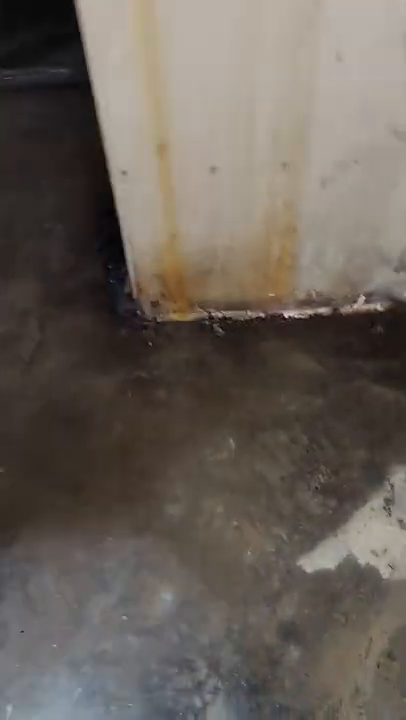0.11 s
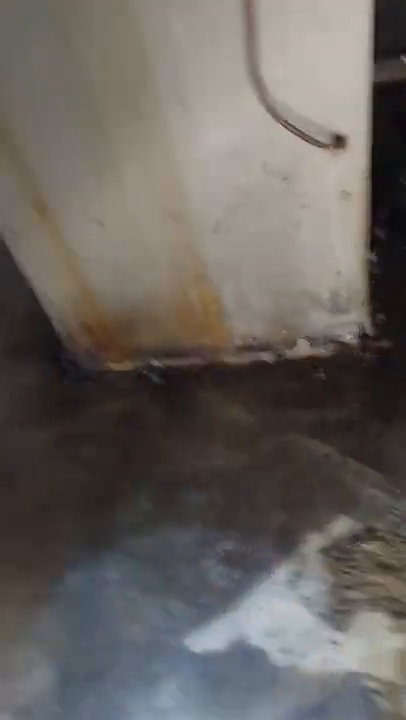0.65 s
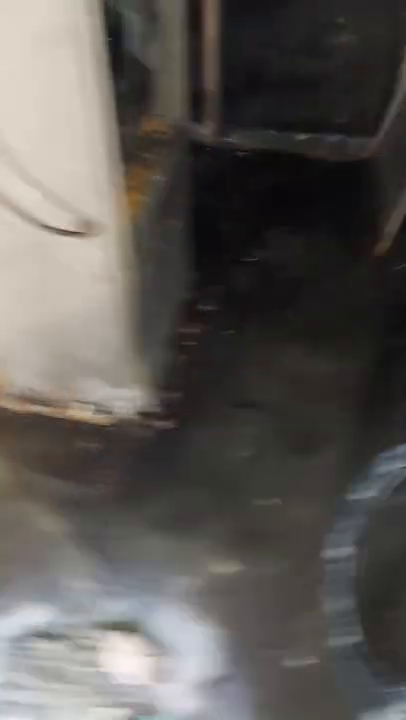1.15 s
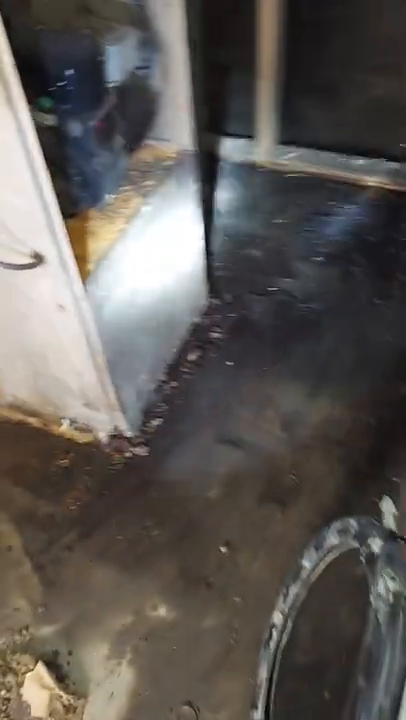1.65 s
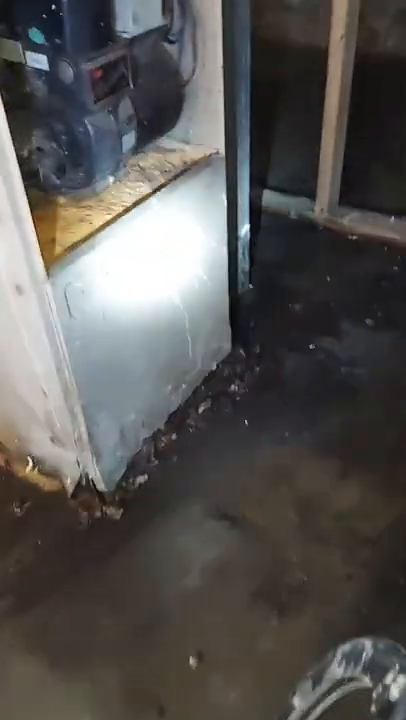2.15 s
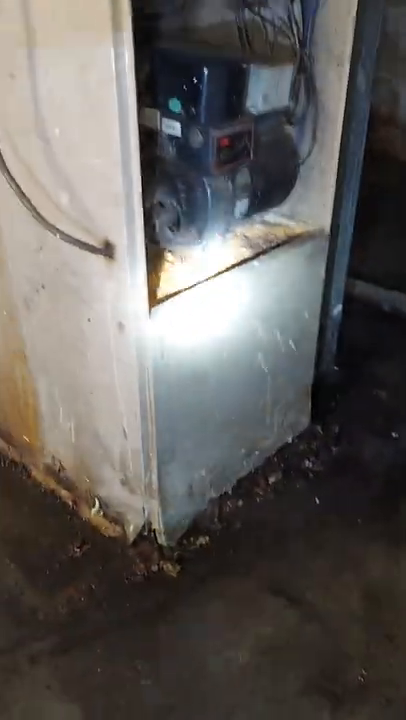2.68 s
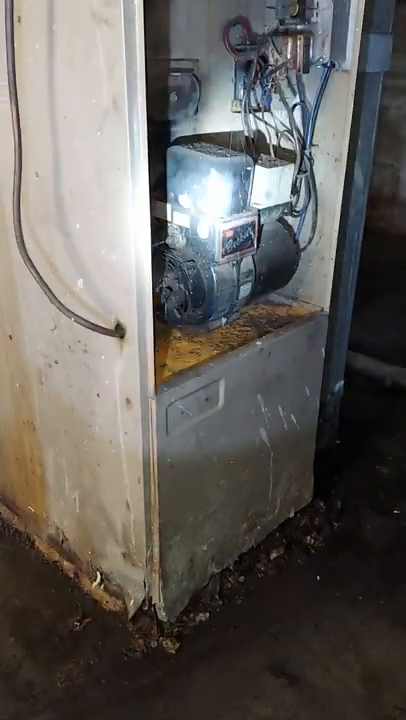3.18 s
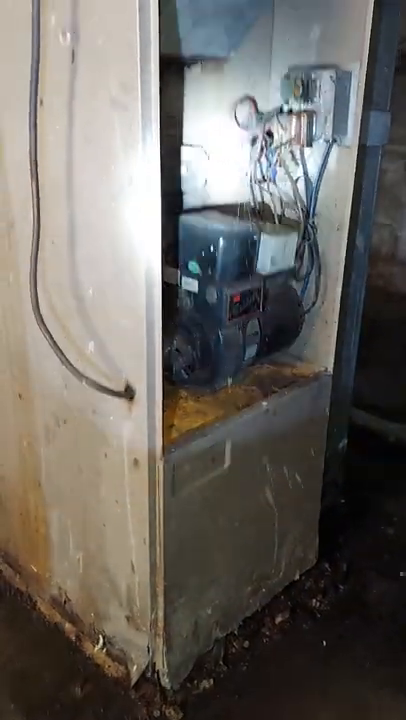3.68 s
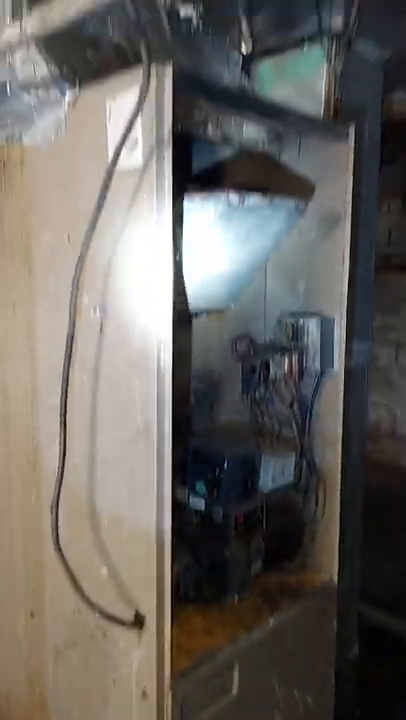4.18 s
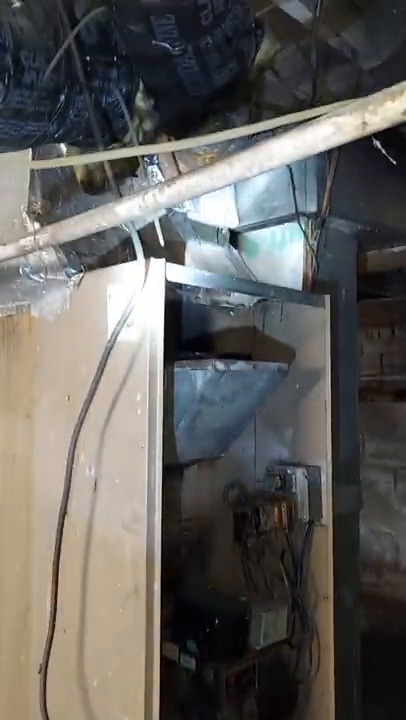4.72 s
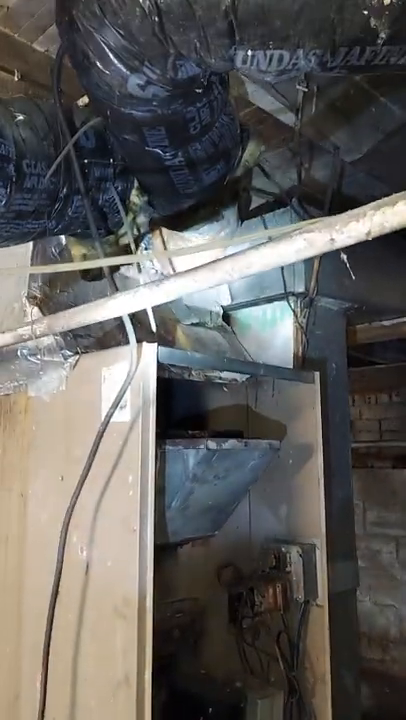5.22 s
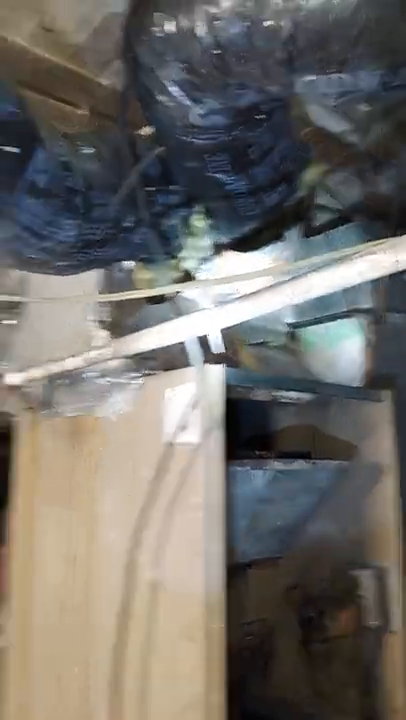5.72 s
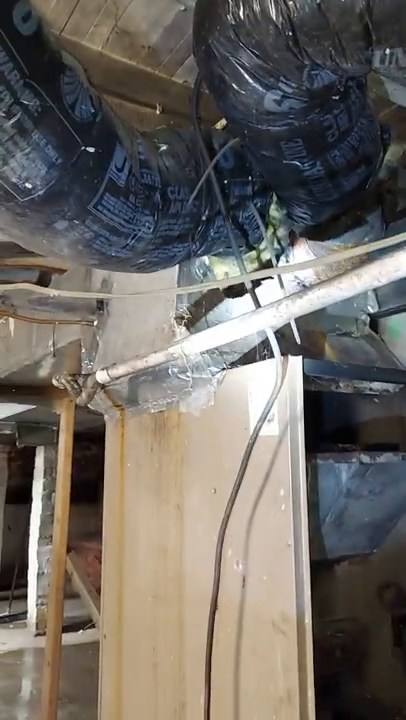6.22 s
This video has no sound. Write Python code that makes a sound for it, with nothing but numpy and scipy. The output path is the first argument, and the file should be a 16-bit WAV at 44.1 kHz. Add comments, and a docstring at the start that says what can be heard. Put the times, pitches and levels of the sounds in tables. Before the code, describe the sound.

In a bare basement, shoes shuffle slowly on gritty concrete close to a handheld phone. Soft crunches and bright cloth rustle come first, then a low finger thump at about one second, mostly on the left. A stronger scrape near two seconds leads to sharp grit clicks around three, then sparse scuffs and a last shuffle over faint hiss.

```python
"""Soles shuffle slowly over a gritty concrete floor in a bare basement; the listener is a phone in the hand.
Grit and cloth swish brightly as noise gated by thousands of tiny slips; weight shifts crunch lower down
with fewer, longer slips. Caught grit squeals as narrow noise, and single grains crack as short clicks
that ring and echo off the walls. Moving air rumbles at the two microphone ports as low noise,
fingers thump as sagging tones, and a faint, nearly steady hiss with some bass lies below."""
import sys
import numpy as np
from scipy import signal
from scipy.io import wavfile

SR = 44100
rng = np.random.default_rng(int(sys.argv[2]) if len(sys.argv) > 2 else 0)


def pcm_store(signal):
    """Save signal as 16-bit PCM."""
    levels = np.round(np.clip(np.atleast_2d(signal), -1, 1) * 32767)
    wavfile.write(sys.argv[1], SR, levels.astype(np.int16).T)


def ratio_of_db(decibels):
    """Turn decibels (scalar or array-like) into linear amplitude factors; 0 dB maps to 1."""
    return 10 ** (np.asarray(decibels, float) / 20)


N = 280476   # length in samples

# how alike the noise is on the left and right: f/Hz, likeness (1 = same, 0 = unrelated)
LIKENESS = [(60, 0.036), (170, 0.98), (400, 0.66), (950, 0)]
# weight comes onto a sole: peak t/s, swell/s, time to fade 20 dB/s, crunch level/dB, centre f/Hz
TREADS = [(0.039, 0.075, 0.33, -48.5, 376), (0.15, 0.025, 0.28, -47.5, 347), (0.235, 0.041, 0.13, -47, 467),
          (0.378, 0.012, 0.25, -49, 310), (0.44, 0.014, 0.53, -54, 425), (0.888, 0.13, 0.5, -54.5, 445),
          (1.13, 0.042, 0.18, -45.5, 297), (1.356, 0.032, 0.64, -54.5, 417), (1.684, 0.04, 0.3, -41, 390),
          (1.711, 0.065, 0.04, -41, 202), (1.784, 0.04, 0.19, -43, 360), (1.91, 0.0175, 0.18, -42, 284),
          (2.012, 0.092, 0.13, -42.5, 535), (2.42, 0.15, 1.73, -60, 480), (2.681, 0.05, 0.17, -52, 350),
          (2.955, 0.031, 0.03, -48.5, 373), (3.268, 0.087, 0.1, -56, 263), (3.635, 0.28, 0.07, -62, 418),
          (4.095, 0.046, 1, -60.5, 423), (4.461, 0.16, 0.23, -56.5, 510), (5.103, 0.161, 0.6, -58, 435),
          (5.47, 0.041, 0.18, -41.5, 400), (5.5, 0.036, 0.2, -51, 220), (5.658, 0.11, 0.9, -58.5, 447),
          (5.879, 0.094, 0.7, -59, 346), (6.04, 0.069, 0.2, -44.5, 460), (6.07, 0.07, 0.11, -40.5, 156),
          (6.188, 0.25, 0.154, -48, 526)]


def rms_one(x):
    """Scale a signal so that its average strength (rms) is 1."""
    return x / np.sqrt(np.mean(x ** 2) + 1e-20)


def at_hz(points, hz):
    """Read a table of (Hz, value) between its points, on a log-frequency axis."""
    table_hz, values = np.array(points).T
    return np.interp(np.log(hz), np.log(table_hz), values)


def band(x, low_hz, high_hz):
    """Keep only the range between two frequencies (Butterworth band-pass)."""
    return signal.sosfilt(signal.butter(2, [low_hz, high_hz], "band", fs=SR, output="sos"), x)


def sides(left_right_db):
    """Gains of the left and right channel for a level difference between them."""
    return ratio_of_db(np.array([[.5], [-.5]]) * left_right_db)


def two_sides(mid, side, hz):
    """Mix two unrelated noises into left and right, as alike as the table asks at this frequency."""
    alike = np.clip(at_hz(LIKENESS, hz), -1, 1)
    return np.sqrt(1 + alike) * mid + np.sqrt(1 - alike) * side * [[1], [-1]]


def drift(rate_hz):
    """Slow random wandering with spread 1: noise smoothed twice, worked out at every 40th sample."""
    r = np.exp(-80 * np.pi * rate_hz / SR)
    noise = rng.standard_normal(N // 40 + 2002)
    slow = signal.lfilter([1], [1, -2 * r, r * r], noise)[2000:]   # skip the filter's start
    return np.interp(np.arange(N) / 40, np.arange(len(slow)), rms_one(slow))


def grains(per_s, spread_db, length_s):
    """Envelope of many slips of uneven size, at random times, each dying away; rms 1."""
    sizes = ratio_of_db(spread_db * np.minimum(rng.exponential(1, N), 5))
    born = rng.random(N) < per_s / SR
    r = np.exp(-1 / (length_s * SR))
    return rms_one(signal.lfilter([1], [1, -r], sizes * born + 1e-18))


def strokes(rows):
    """Each stroke swells in an arch, then fades evenly in dB; powers add. One gain curve per level column."""
    t = np.arange(0, N + 64, 64) / SR   # every 64th sample
    power = 1e-12
    for peak_s, swell_s, fade_s, *levels_db in rows:
        after = t - peak_s
        arch = np.clip(1 - (after / swell_s) ** 2, 0, 1)
        fade = ratio_of_db(-20 * np.maximum(after, 0) / fade_s)
        shape = np.where(after < 0, arch, fade)
        power = power + (ratio_of_db(np.array(levels_db))[:, None] * shape) ** 2
    return [np.interp(np.arange(N) / SR, t, np.sqrt(p)) for p in power]


def rubbing(spectrum, texture, patchy_db):
    """Third-octave bands of stereo noise gated by a texture; each band wanders, so the colour shifts."""
    # left-right balance: f/Hz, left minus right level/dB
    balance = [(500, 4), (1500, -3.5), (5000, 0), (9000, 5), (13000, -1)]
    edges = 40 * 2 ** np.arange(0, 8.8, 1 / 3)
    edges = edges[(edges > .9 * spectrum[0][0]) & (edges < 1.15 * spectrum[-1][0])]
    white = texture * rng.standard_normal((2, 2, N))
    out, power = 0, 0
    for k, (low, high) in enumerate(zip(edges, edges[1:])):
        mid, side = band(white[k % 2], low, high)   # neighbouring bands use different noise
        hz = np.sqrt(low * high)
        level = ratio_of_db(at_hz(spectrum, hz))
        gain = level * ratio_of_db(patchy_db * drift(5.2)) * sides(at_hz(balance, hz))
        out = out + gain * two_sides(mid, side, hz)
        power += level ** 2 * (high - low) * 4 / SR
    return out / np.sqrt(power)   # expected strength without texture, wandering and balance: 1


def pitched(rows, fall_db, edges, texture):
    """Each stroke has its own centre frequency; band by band its noise falls away to both sides."""
    hz = np.sqrt(edges[1:] * edges[:-1])
    shaped = []
    for *timing, db, centre_hz in rows:
        octaves = np.log2(hz / centre_hz)
        slope_db = np.where(octaves < 0, fall_db[0], -fall_db[1])   # per octave: below, above
        share = hz * ratio_of_db(slope_db * octaves) ** 2   # wider bands hold more power
        shaped.append((*timing, *(db + 10 * np.log10(share / share.sum()))))
    white, out = rng.standard_normal((2, 2, N)), 0
    for k, gain in enumerate(strokes(shaped)):
        mid, side = rms_one(band(texture * white[k % 2], edges[k], edges[k + 1]))
        out = out + gain * two_sides(mid, side, hz[k])
    return out


def stillness():
    """Nearly steady faint hiss with some bass: noise bands without slips, each wandering slightly."""
    # colour of the hiss: f/Hz, level per Hz/dB
    hiss = [(24, -52), (40, -9.5), (126, -10), (198, -28), (488, -12), (1010, -39), (1500, -19.5),
            (15800, -31.5)]
    return ratio_of_db(-69) * rubbing(hiss, texture=0.96, patchy_db=1.0)


def air_rumble():
    """Air shoves the ports in gusts and with every tread: lumpy low noise, partly shared by both ports."""
    # gusts: peak t/s, swell/s, level/dB
    gusts = [(0.05, 0.098, -51.5), (1.7, 0.05, -58), (1.93, 0.038, -52), (2.68, 0.073, -57),
             (6.12, 0.075, -46)]
    still_air_db, tread_rumble_db = -78, -16   # floor between shoves; rumble relative to the crunch
    gust_fade = 2.3   # time to fade 20 dB, in swells
    shoves = [(s, swell_s, gust_fade * swell_s, db) for s, swell_s, db in gusts]
    shoves += [(*timing, db + tread_rumble_db) for *timing, db, _ in TREADS]
    rumble, = strokes(shoves)
    wander_db = 2.5 * np.array([drift(9), drift(9)])
    lumps = np.hypot(rumble, ratio_of_db(still_air_db)) * ratio_of_db(wander_db)
    own, shared = rng.standard_normal((2, N)), rng.standard_normal(N)
    return lumps * rms_one(band(own + 1.4 * shared, 42.0, 165))


def thumps():
    """Fingers thump the case: low tones that swell quickly and sag in pitch as they die."""
    # thumps: start t/s, level on the louder side before swell and fade/dB, starting f/Hz, ring/s,
    # left minus right level/dB
    thump_rows = [(0.486, -36.5, 77.5, 0.072, -24), (0.64, -41, 492, 0.026, 2.5),
                  (1.03, -27, 129, 0.018, 11), (1.053, -18, 93.5, 0.045, 37)]
    out = np.zeros((2, N))
    t = np.arange(round(.13 * SR)) / SR
    for s, peak_db, hz, ring_s, pan_db in thump_rows:
        cycles = hz * ring_s * (1 - np.exp(-t / ring_s))   # the pitch sinks evenly in octaves
        swell = (1 - np.exp(-t / .004)) * np.exp(-(2.6 * t / ring_s) ** 2)
        gain = ratio_of_db(peak_db - abs(pan_db) / 2) * sides(pan_db)
        i = round(s * SR)
        out[:, i:i + len(t)] -= gain * swell * np.sin(2 * np.pi * cycles)
    return out


def basement(x):
    """Dense reflections off bare walls: dying noise of its own for each side."""
    t60_s = 0.19   # time for the echoes to die by 60 dB
    t = np.arange(round(.4 * SR)) / SR
    tail = rng.standard_normal((2, len(t))) * ratio_of_db(-60 * t / t60_s) * (t > .003)
    tail = tail / np.sqrt(np.sum(tail ** 2) / 2)
    return signal.fftconvolve(x, tail, axes=1)[:, :N]


def cracks():
    """A grain's click rings for a few cycles, bounces once and crushes on as dying noise around its pitch."""
    # single grains: t/s, peak level of the first click/dB, ring f/Hz, crush fade/s
    crack_rows = [(1.1742, -23.5, 3600, .002), (2.387, -37, 3300, .001), (2.8005, -37, 4500, .001),
                  (2.8504, -26, 1700, .003), (2.856, -30, 2160, .012), (2.952, -34, 2500, .002),
                  (3.1073, -21.5, 2050, .024), (3.7145, -37.5, 2120, .008), (3.864, -46, 1600, .012),
                  (4.731, -39, 4600, .0008), (4.8975, -40, 3900, .0008), (5.200, -42, 3000, .002)]
    out = np.zeros((2, N))
    t = np.arange(round(.1 * SR)) / SR
    bursts = rng.standard_normal((len(crack_rows), 2, len(t)))
    for (s, peak_db, hz, crush_s), burst in zip(crack_rows, bursts):
        click = .5 * burst * np.exp(-t / .0005)
        ring = np.sin(2 * np.pi * hz * t) * np.exp(-t * hz / 2)
        crush = rms_one(band(burst, .75 * hz, 1.3 * hz)) * np.exp(-t / crush_s)
        crack = click + ring + .35 * crush
        crack = band(band(crack, 1400, 15000), 1400, 15000)   # twice, for steeper edges
        crack *= ratio_of_db(peak_db) * sides(-0.65) / np.max(np.abs(crack.mean(axis=0)))
        for bounce_s, share in (0, 1), (.0008, .5):
            i = round((s + bounce_s) * SR)
            out[:, i:i + len(t)] += share * crack
    return out


def squeals(texture):
    """Grit caught under a sole sings in a narrow range: noise that falls away steeply around its centre."""
    # squeals: peak t/s, swell/s, level/dB, centre f/Hz
    squeal_rows = [(1.672, 0.035, -46.5, 2140), (1.925, 0.034, -44.5, 2090), (2.636, 0.038, -50, 2090),
                   (2.669, 0.12, -48.5, 4130), (3.52, 0.06, -55, 2040), (4.09, 0.04, -55, 1110),
                   (4.43, 0.063, -43.5, 2340), (6.04, 0.044, -44, 1100)]
    fade = 2.8   # time to fade 20 dB, in swells
    rows = [(s, swell_s, fade * swell_s, db, hz) for s, swell_s, db, hz in squeal_rows]
    fall_db = 25, 27   # per octave below and above the centre
    return pitched(rows, fall_db, np.geomspace(800, 6000, 19), texture)


def crunch():
    """Loaded soles: fewer, longer slips than a swish, each tread with its own low centre frequency."""
    texture = grains(per_s=1200, spread_db=3.0, length_s=.005)
    fall_db = 15.5, 12   # per octave below and above the centre
    return pitched(TREADS, fall_db, np.geomspace(100, 1300, 15), texture)


def swish():
    """Dense short slips and scattered larger grains: grit rasps and sings mid-range, cloth rustles above."""
    # soles drag grit, cloth moves along: peak t/s, swell/s, time to fade 20 dB/s,
    # rasp level/dB, rustle level/dB
    scuffs = [(0.043, 0.074, 0.221, -45.0, -43.0), (0.293, 0.186, 0.184, -46.0, -43.0),
              (0.452, 0.11, 0.238, -49.0, -51.0), (0.555, 0.093, 0.079, -50.0, -53.0),
              (0.83, 0.192, 0.404, -54.0, -48.5), (0.877, 0.038, 0.24, -44.5, -53.0),
              (0.937, 0.015, 0.055, -47.0, -43.0), (1.118, 0.018, 0.2, -47.0, -49.0),
              (1.366, 0.03, 0.29, -50.0, -56.0), (1.589, 0.048, 0.361, -52.0, -66.0),
              (1.773, 0.1, 0.19, -38.0, -46.0), (1.908, 0.017, 0.189, -44.0, -51.5),
              (2.035, 0.155, 0.15, -37.5, -46.5), (2.386, 0.292, 0.6, -60.5, -63.5),
              (2.47, 0.06, 0.19, -51.0, -53.5), (2.66, 0.045, 0.2, -50.0, -47.5),
              (2.862, 0.109, 0.196, -48.5, -50.5), (2.933, 0.008, 0.08, -41, -43),
              (3.118, 0.019, 0.15, -43.5, -41), (3.22, 0.06, 0.3, -58, -60),
              (3.43, 0.07, 0.37, -56.5, -55.5), (3.554, 0.135, 0.386, -54.5, -57.5),
              (3.729, 0.041, 0.156, -51.5, -50.0), (4.094, 0.035, 0.21, -49.0, -50.5),
              (4.41, 0.09, 0.23, -40, -44.5), (4.51, 0.233, 0.07, -44.0, -44.5),
              (5.01, 0.042, 0.2, -50.5, -56.0), (5.059, 0.013, 0.139, -43.5, -52.5),
              (5.21, 0.02, 0.326, -53.5, -59.5), (5.47, 0.042, 0.14, -43.0, -42.0),
              (5.671, 0.133, 0.107, -48.0, -54.0), (5.789, 0.045, 0.6, -54.0, -61.5),
              (5.944, 0.018, 0.168, -48.5, -54.5), (6.028, 0.036, 0.237, -45.5, -49.5),
              (6.1, 0.008, 0.215, -41.5, -45.0), (6.222, 0.204, 0.081, -46.0, -51.5)]
    # colour of the grit: f/Hz, level per Hz/dB
    rasp_colour = [(850, -11.5), (1200, -3), (1600, 1.5), (2500, -1.5), (4500, -3.5), (6500, -25)]
    # colour of the cloth: f/Hz, level per Hz/dB
    cloth_colour = [(2500, -25.5), (5000, -4), (8000, -2), (9300, -6.5), (12000, -4), (15800, 0)]
    rasp, rustle = strokes(scuffs)
    slips = grains(per_s=5000, spread_db=2.0, length_s=.002)
    larger = grains(per_s=70, spread_db=3.5, length_s=.0014)
    texture = rms_one(slips + .26 * larger)
    grit = rasp * rubbing(rasp_colour, texture, patchy_db=2.5)
    cloth = rustle * rubbing(cloth_colour, texture, patchy_db=1.5)
    return grit + squeals(texture) + cloth


def scene():
    """Add the still background, the ports, the cracks with their echoes, and the shuffling soles."""
    background = stillness() + air_rumble() + thumps()
    grit = cracks()
    echoes = ratio_of_db(-5.5) * basement(grit)
    return background + grit + echoes + crunch() + swish()


def band_limit(x):
    """A steep low-pass at the top of the band."""
    return signal.sosfilt(signal.butter(12, 16790, fs=SR, output="sos"), x)


def record(dry):
    """A narrow resonance near the microphones stands out of the broad sound; the top is cut."""
    # resonance that colours all sound: f/Hz, width/Hz, boost/dB
    body = [(1521, 40, 7.5)]
    out = dry
    for hz, width_hz, db in body:
        r = np.exp(-np.pi * width_hz / SR)
        rise = [(1 - r * r) / 2, 0, (r * r - 1) / 2]
        ring = [1, -2 * r * np.cos(2 * np.pi * hz / SR), r * r]
        out = out + (ratio_of_db(db) - 1) * signal.lfilter(rise, ring, dry)
    top_cut = signal.ellip(10, .5, 70, 15850, fs=SR, output="sos")   # steep low-pass, 15850 Hz
    return band_limit(signal.sosfilt(top_cut, out))


dry = scene()
out = record(dry)
pcm_store(out)
```